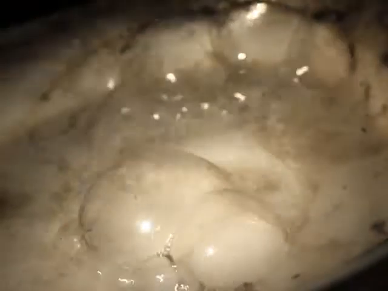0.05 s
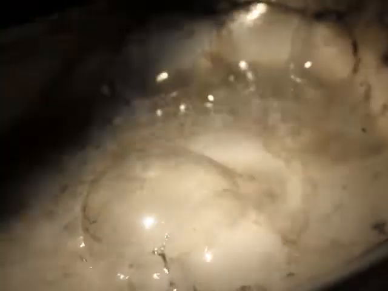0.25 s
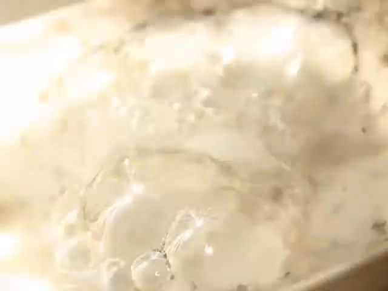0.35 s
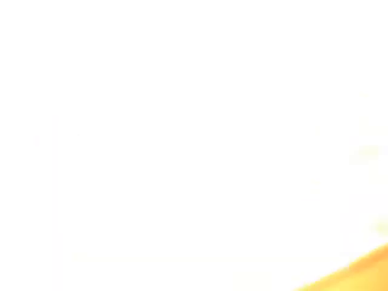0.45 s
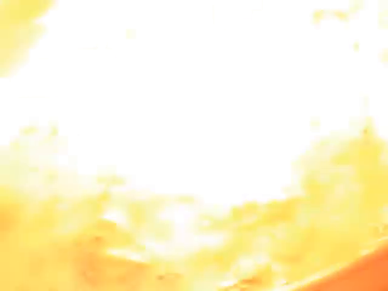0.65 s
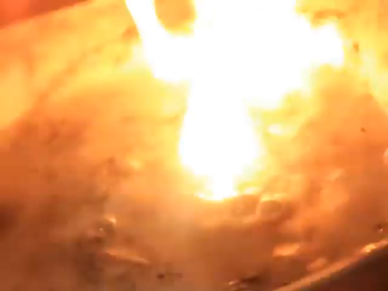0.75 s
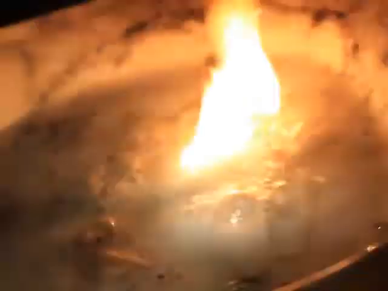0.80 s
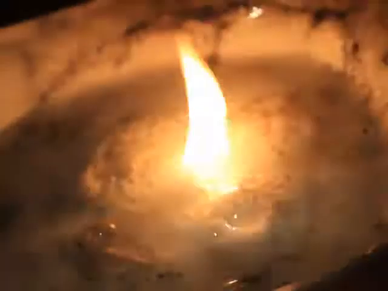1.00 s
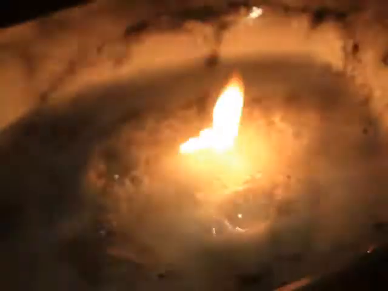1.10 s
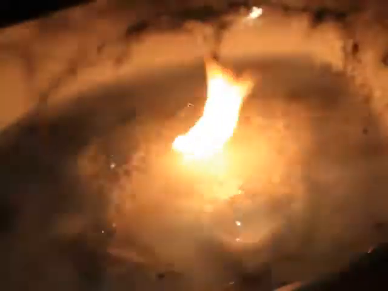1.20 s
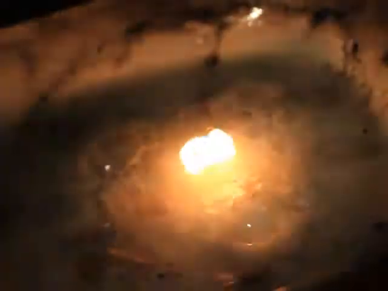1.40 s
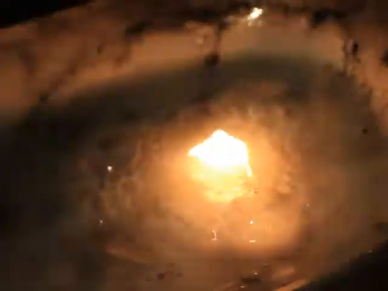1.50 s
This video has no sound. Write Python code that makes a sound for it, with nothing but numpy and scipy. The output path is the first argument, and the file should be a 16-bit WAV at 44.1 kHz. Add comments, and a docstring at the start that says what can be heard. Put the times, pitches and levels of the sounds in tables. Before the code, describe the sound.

Gas bubbles ignite in a dish with a quick run of sharp pops.

```python
"""Lighting gas bubbles in a dish

Close to the microphone in a small room, a lighter flint rasps over a dish of wet, gassing paste.
The bubbles go off in a quick run of pops that ring the dish and grow weaker, among tiny spits
of liquid. Behind them are the fizz of the paste and a soft hiss of gas that dips and recovers."""
import sys
import numpy as np
from scipy import signal
from scipy.fft import rfft, irfft
from scipy.io import wavfile

SR = 44100
rng = np.random.default_rng(int(sys.argv[2]) if len(sys.argv) > 2 else 0)


def put_to_file(sound):
    """Save the sound as 16-bit audio at rate SR, in the file named by the first command-line argument."""
    columns = np.atleast_2d(sound).T  # one column per channel
    safe = np.clip(columns, -1, 1)
    whole_steps = np.round(safe * 32767)
    wavfile.write(sys.argv[1], SR, whole_steps.astype(np.int16))


N = 68355
T = np.arange(N) / SR


def undb(db):
    """Decibels to gain."""
    return 10 ** (np.asarray(db) / 20)


def unit(x):
    """Scale to rms 1."""
    return x / np.sqrt(np.mean(x ** 2))


def curve(points):
    """Gain over time from (s, dB) points."""
    return undb(np.interp(T, *np.array(points).T))


def colour(x, tone):
    """Minimum-phase filter through (Hz, dB) points."""
    hz, db = np.array(tone).T
    bin_hz = np.arange(N + 1) * SR / (2 * N)
    gain = undb(np.interp(np.log(bin_hz + 1), np.log(hz), db))
    cepstrum = irfft(np.log(gain))
    cepstrum[1:N] *= 2  # folded onto positive time, so nothing sounds early
    cepstrum[N + 1:] = 0
    return irfft(rfft(x, 2 * N) * np.exp(rfft(cepstrum)))[:N]


def noise(tone):
    """Coloured noise of rms 1."""
    return unit(colour(rng.standard_normal(N), tone))


def even_noise(envelope):
    """A burst of noise under an envelope, evened out to hold all pitches alike; energy 1."""
    burst = rng.standard_normal(N) * envelope
    for _ in range(3):
        spectrum = rfft(burst)
        burst = irfft(spectrum / (np.abs(spectrum) + 1e-12), N) * envelope ** .25
    return burst / np.sqrt(np.sum(burst ** 2))


def wander(rate_hz):
    """Smooth random drift of rms 1."""
    return unit(np.interp(T * rate_hz, np.arange(N), rng.standard_normal(N)))


def convolve(x, response):
    """Pass a sound through an impulse response."""
    return signal.fftconvolve(x, response)[:N]


# The air of the room. Each row: frequency in Hz, relative level in dB.
RUMBLE_TONE = [(20, 9), (45, -13), (75, -0.5), (130, -3.5), (260, -1.5), (400, -11.5), (700, -14),
               (1500, -29), (4000, -36), (16000, -51)]


def air_rumble():
    """The air rumbles low and steady behind everything."""
    return undb(-42) * noise(RUMBLE_TONE)


# Level of the hiss, with the recorder's gain dip drawn in. Each row: time in seconds, level in dB.
HISS_LEVELS = [(0, -40.5), (0.3, -43.5), (0.45, -48), (0.56, -53), (0.64, -47), (0.72, -44.5), (0.9, -43.5),
               (1.05, -42), (1.55, -41.5)]
# Its colour. Each row: frequency in Hz, relative level in dB.
HISS_TONE = [(200, 8), (600, 3.5), (1200, 3.5), (2000, 0), (2700, -4), (4200, 0), (6000, -9.5),
             (10000, -26.5), (16000, -44)]


def gas_hiss():
    """A soft, faintly fluttering hiss dips after the loud pops, as the recorder ducks, then recovers."""
    hiss = noise(HISS_TONE) * curve(HISS_LEVELS)
    flutter_db = 0.6 * wander(rate_hz=29.95)
    return hiss * undb(flutter_db)


# Fizz of the paste, heard close. Each row: time in seconds, level in dB.
FIZZ_LEVELS = [(0, -46), (0.3, -44), (0.46, -53), (0.56, -70), (0.7, -62), (0.9, -53), (1.2, -51),
               (1.55, -68)]
# Its colour. Each row: frequency in Hz, relative level in dB.
FIZZ_TONE = [(1500, 12), (5000, -1), (8000, 4), (13000, 2.5), (16000, 1)]


def fizz(bubbles_per_s=2500):
    """Countless small bubbles break on the paste: random clicks over a softer bed of hiss."""
    clicks = (rng.random(N) < bubbles_per_s / SR) * rng.standard_normal(N)
    boost_db = 4 * np.minimum(rng.exponential(size=N), 3)
    crackle = unit(colour(clicks * undb(boost_db), FIZZ_TONE))
    bed = undb(-4.5) * noise(FIZZ_TONE)
    return unit(crackle + bed) * curve(FIZZ_LEVELS)


# One stroke of the lighter wheel, near the microphone. Each row: time in seconds, level in dB.
FLINT_LEVELS = [(0.231, -51), (0.235, -22), (0.2385, -27), (0.240, -17), (0.243, -14.5), (0.255, -15.5),
                (0.264, -13), (0.269, -18.5), (0.274, -12), (0.278, -37), (0.29, -36.5), (0.305, -53)]
# Its colour. Each row: frequency in Hz, relative level in dB.
FLINT_TONE = [(60, -24), (900, -9.5), (1400, -6.5), (2700, -5.5), (4000, -7.5), (4900, 0.5), (7500, 1),
              (10500, 3), (14000, 2.5), (16000, -7)]


def flint(roughness_db=3):
    """The wheel grinds the flint: a short, bright, grainy rasp."""
    rasp = noise(FLINT_TONE)
    grain = unit(undb(roughness_db * wander(rate_hz=1826)))
    return rasp * grain * curve(FLINT_LEVELS)


# Droplets spitting from the dish. Each row: start in seconds, relative level in dB.
SPITS = [(0.3096, -22), (0.3115, -33), (0.3157, -17), (0.3692, -27), (0.3836, -24), (0.4655, -31),
         (0.4873, -31), (0.6209, -26), (0.764, -28), (0.8128, -25), (0.8569, -20)]
# Their colour. Each row: frequency in Hz, relative level in dB.
SPIT_TONE = [(1000, -27), (4000, 1), (9000, -4), (12500, 5), (16000, -0.5)]


def spits(decay_s=0.00088):
    """Each spit of liquid is a tiny bright tick of noise."""
    envelope = np.zeros(N)
    for start, db in SPITS:
        envelope += undb(db) * (T >= start) * np.exp(-np.abs(T - start) / decay_s)
    return envelope * noise(SPIT_TONE) / 2


# Bubbles burning off, close up. Each row: start in seconds, length in seconds, level in dB,
# treble corner in Hz, cavity resonance in Hz, spray in dB relative to the pop.
POPS = [(0.3227, .0115, -12, 2500, 1970, -21.5), (0.3424, 0.002, -23.5, 1100, 800, -22),
        (0.3965, 0.00825, -11, 1670, 1200, -15.5), (0.4906, 0.0078, -16.5, 840, 714, -15.5),
        (0.585, 0.0085, -38.5, 2460, 2150, -5), (0.6459, 0.0036, -26, 1580, 720, -14),
        (0.7944, 0.0022, -34.5, 2300, 1590, -12), (0.8422, 0.0038, -38.5, 2270, 1110, -15),
        (1.444, 0.0083, -38, 1680, 1000, -22)]
# Hiss of the fine spray. Each row: frequency in Hz, relative level in dB.
SPRAY_TONE = [(1500, -4.5), (4000, 4), (6500, 4), (8500, 1), (11500, 3), (16000, -7)]


def pops(attack_s=.0008, release_s=.0018, cavity_q=5.6):
    """Each bubble burns for milliseconds: a turbulent push of air, coloured by its cavity, and spray."""
    push, spray_envelope = np.zeros(N), np.zeros(N)
    hz = np.geomspace(20, SR / 2, num=120)
    for start, length, db, corner_hz, cavity_hz, spray_db in POPS:
        age = T - start
        burn = np.clip(age / attack_s, 0, 1) * np.exp(-np.maximum(age - length, 0) / release_s)
        roll_off_db = -10 * np.log10(1 + (hz / corner_hz) ** 3)  # 9 dB per octave
        cavity_db = 5.5 / (1 + (cavity_q * (hz / cavity_hz - cavity_hz / hz)) ** 2)
        flame = colour(even_noise(burn), np.c_[hz, roll_off_db + cavity_db])
        flame *= np.sqrt(np.sum(burn ** 2) / np.sum(flame ** 2))  # same energy as its envelope
        push += undb(db) * flame
        spray_envelope += undb(db + spray_db) * burn
    return push, spray_envelope * noise(SPRAY_TONE)


# Sharp snaps among the pops. Each row: start in seconds, relative level in dB, frequency in Hz.
SNAPS = [(0.3233, 3.5, 2000), (0.3258, -2, 2300), (0.3327, -4.5, 2330), (0.333, -5.5, 860),
         (0.357, -17, 910), (0.3597, -13, 605), (0.398, -12.5, 1280), (0.4026, 4.5, 2750),
         (0.4633, -27, 3800), (0.4945, -9.5, 1150), (0.498, -14, 334), (0.5912, -15.5, 2480),
         (0.6449, -18.5, 1240), (0.647, -18.5, 2000), (0.7915, -23.5, 1830), (0.842, -26, 1930),
         (1.4962, -26, 1530), (1.4992, -27.5, 1240), (1.5452, -32, 2020)]


def snaps(damping_per_cycle=2.21):
    """A bursting bubble sends out a spike of pressure, then a weaker suction, with a crisp edge."""
    pressure = np.zeros(N)
    edge = undb(-1.5) * noise(SPRAY_TONE)
    for start, db, hz in SNAPS:
        cycles = np.maximum(T - start, 0) * hz
        envelope = 2 * undb(db) * np.exp(-damping_per_cycle * cycles)
        pressure += envelope * (np.sin(2 * np.pi * cycles) + edge * (cycles > 0))
    return pressure


# Modes of the dish and the air in it. Each row: frequency in Hz, time to fall 60 dB in seconds,
# relative level in dB.
DISH_MODES = [(268, 0.081, 0), (426, 0.051, -5.5), (604, 0.056, -13), (963, 0.11, 3), (1213, 0.11, -2.5),
              (1487, 0.045, 1.5), (1770, 0.029, 0), (2092, 0.071, 2), (2580, 0.02, 1.5), (3196, 0.037, 0.5),
              (4070, 0.053, -8)]
# Colour of the pops and snaps on their way to the microphone. Each row: frequency in Hz, gain in dB.
DIRECT_TONE = [(20, -33), (40, -11.5), (65, -7.5), (130, -7), (210, 0), (290, 1.5), (450, 1), (540, -9),
               (660, 4.5), (820, -7.5), (1000, -4), (2500, -4), (4000, -14.5), (16000, -19)]


def dish(push):
    """Every push of air is heard directly and sets the dish ringing briefly."""
    ring = np.zeros(N)
    for hz, t60, db in DISH_MODES:
        decay = np.log(1000) / t60
        gain = undb(db) * 2 * decay / SR  # resonance height independent of ring time
        ring += gain * np.exp(-decay * T) * np.cos(2 * np.pi * hz * T)
    return colour(push, DIRECT_TONE) + undb(-2) * convolve(push, ring)


# Colour of the small room's reflections. Each row: frequency in Hz, relative level in dB.
ROOM_TONE = [(100, -3.5), (350, 7.5), (700, 5.5), (2000, 0.5), (5000, 0), (14000, 5)]


def room(near, t60_s=.17, tail_db=-15):
    """Nearby surfaces add a short diffuse tail to the close sound."""
    tail = even_noise(np.exp(-np.log(1000) * T / t60_s))
    return near + undb(tail_db) * convolve(near, colour(tail, ROOM_TONE))


def scene():
    """Flint, pops and spits close up in the room, over fizz, hiss and the rumble of the air; mono."""
    push, spray = pops()
    near = flint() + dish(push + snaps()) + spray + spits()
    return (room(near) + fizz() + gas_hiss() + air_rumble())[None]


def record(dry, bass_hz=35, top_hz=15850):
    """The microphone drops the deepest bass, the loudest peaks clip and the top is cut."""
    low_cut = signal.butter(2, bass_hz, "high", fs=SR, output="sos")
    high_cut = signal.ellip(10, .2, 80, top_hz, fs=SR, output="sos")
    clipped = np.clip(signal.sosfilt(low_cut, dry), -.95, .95)
    return signal.sosfilt(high_cut, clipped)


dry = scene()
out = record(dry)
put_to_file(out)
```